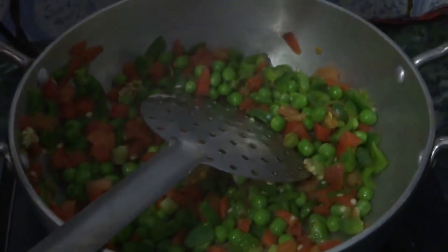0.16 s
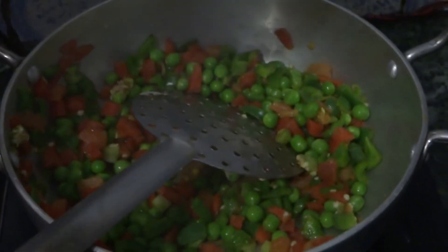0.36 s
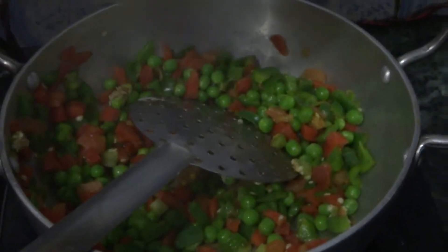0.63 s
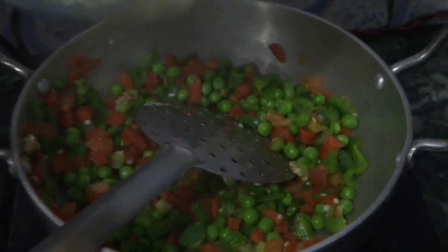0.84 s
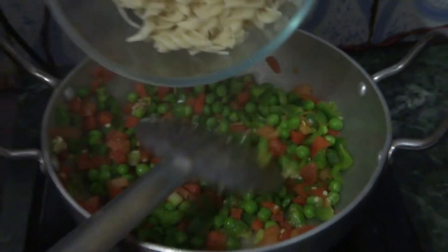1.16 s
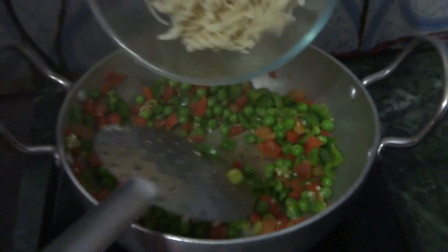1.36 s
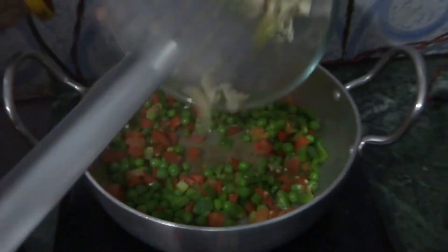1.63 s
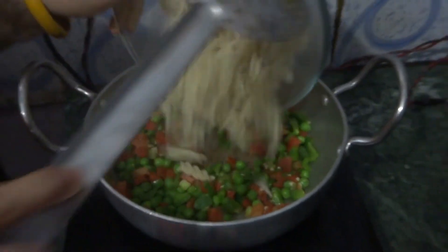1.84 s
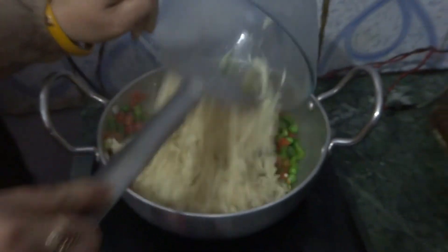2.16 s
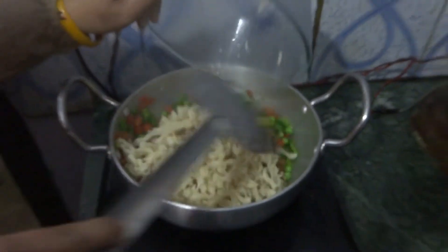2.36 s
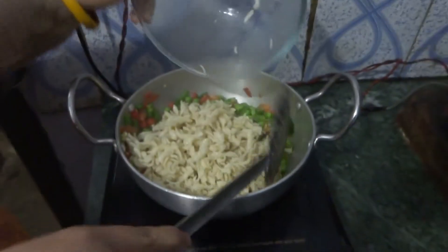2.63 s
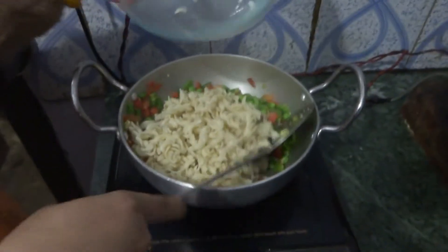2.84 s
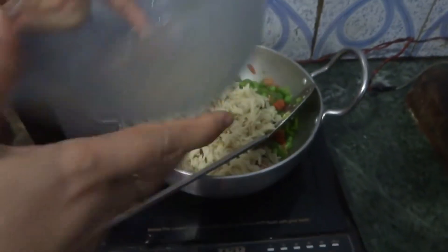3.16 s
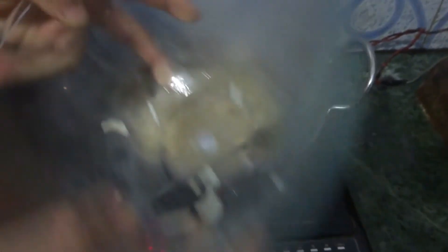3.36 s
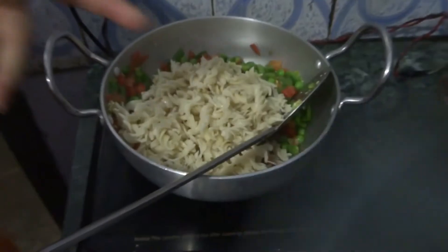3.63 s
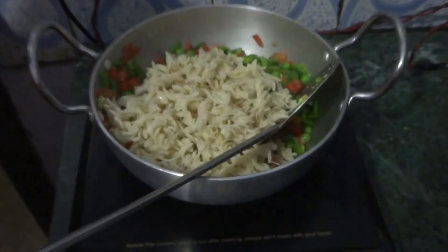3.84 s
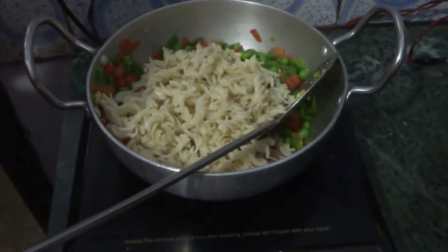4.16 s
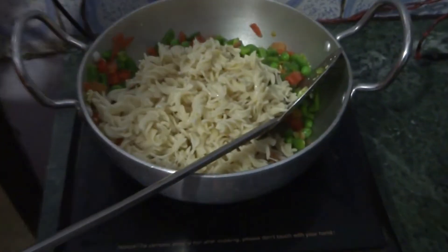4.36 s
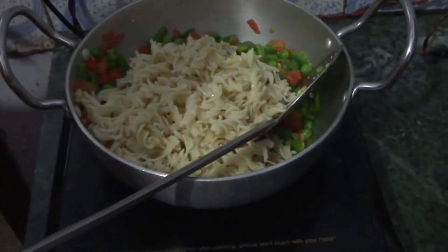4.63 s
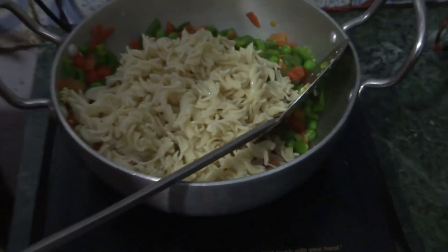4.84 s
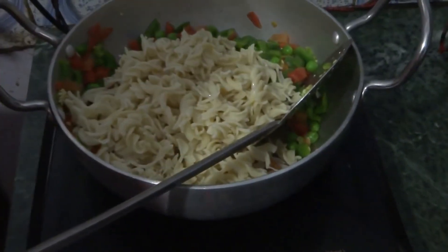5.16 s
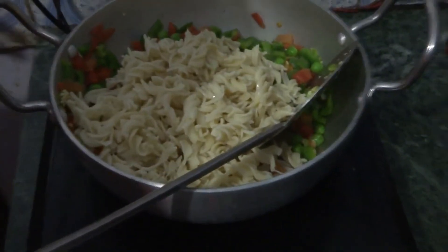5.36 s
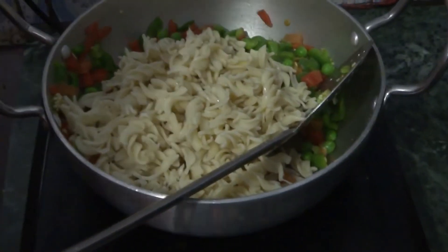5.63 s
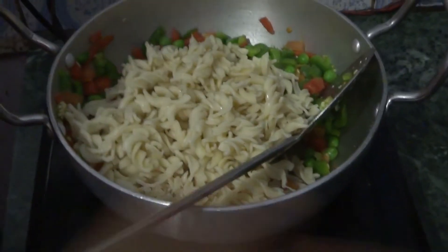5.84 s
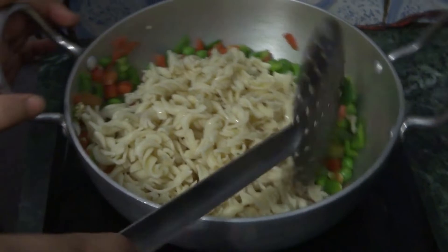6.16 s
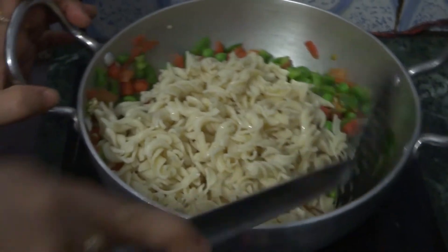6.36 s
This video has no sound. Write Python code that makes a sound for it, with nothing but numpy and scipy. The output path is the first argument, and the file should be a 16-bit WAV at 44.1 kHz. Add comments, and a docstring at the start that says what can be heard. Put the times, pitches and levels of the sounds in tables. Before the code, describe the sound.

Vegetables sizzle in a metal pan, the hot oil crackling with occasional sharp spits. Pasta is tipped in and the frying turns wetter and louder while a steel spatula clinks against the pan and a glass bowl. Dull knocks follow as the bowl is set on the counter, then the spatula taps and scrapes briefly. A hob fan hums faintly underneath, all heard close up in a home kitchen.

```python
"""Vegetables sizzle in a metal pan: hot oil crackles and spits while water bubbles out of the food.
Pasta is tipped in and the sizzle turns wetter. A slotted steel spatula clinks on the pan and a glass
bowl, things are put down on the counter, and at the end the spatula scrapes. Behind it all hums the
cooling fan of the induction hob. Each source makes two signals: the sound that comes straight to the
listener and the sound scattered by the kitchen."""
import sys
import numpy as np
from scipy import signal
from scipy.fft import rfft, irfft
from scipy.io import wavfile
from scipy.ndimage import uniform_filter1d

SR = 44100
rng = np.random.default_rng(int(sys.argv[2]) if len(sys.argv) > 2 else 0)


def pcm_store(signal):
    """Save signal as 16-bit PCM."""
    levels = np.round(np.clip(np.atleast_2d(signal), -1, 1) * 32767)
    wavfile.write(sys.argv[1], SR, levels.astype(np.int16).T)


N = 286650
TIME = np.arange(N) / SR
HZ = np.fft.rfftfreq(N, 1 / SR)


def sizzle(flutter_db=0.7):
    """Fizzing oil and boiling water together, with a slight flutter in loudness."""
    fizz_db, wet_db = frying_levels()
    return (oil_fizz(fizz_db) + wet_frying(wet_db)) * amp(flutter_db * drift(rate_hz=19))


# The tone of the oil. Each row: frequency in Hz, relative level in dB.
OIL_TONE = [(1500, -30), (2600, -12), (4500, -1.3), (6000, -2), (7200, -8), (8200, 1), (9100, 3),
            (10500, 1.7), (12000, -1.7), (14500, -1.5), (16000, -8)]

def oil_fizz(level_db, wash_db=0.5):
    """Hot oil bursts in thousands of tiny cracks, which the kitchen blurs into a wash of hiss."""
    cracks = echoes(unit(clicks(per_s=3000, spread_db=4.3)), db=-6, t60=0.035)
    wash = amp(wash_db) * rng.standard_normal((2, N))
    return unit(shape(cracks + wash, spectrum(OIL_TONE))) * amp(level_db)


# The tone of wet food frying. Each row: frequency in Hz, relative level in dB.
WET_TONE = [(500, -22), (1200, -4), (1600, -3), (1950, 2), (2600, -3.8), (3300, 1), (4400, 2.7), (5600, 0),
            (7000, -4.7), (8500, -1.5), (11000, -9.5), (16000, -24)]

def wet_frying(level_db, wash_db=1.5, sputter_db=0.6):
    """Water boils out of the food in larger bubbles, sputtering over a wash of hiss."""
    boil = bubbles(low_hz=1170, high_hz=13540, per_s=4000, spread_db=1.8, cycles=1.7)
    boil = echoes(boil, db=-10, t60=0.035)
    wash = amp(wash_db) * rng.standard_normal((2, N))
    return unit(shape(boil + wash, spectrum(WET_TONE))) * amp(level_db + sputter_db * drift(rate_hz=40))


# Wet food is pushed onto the hot metal and the frying flares up.
# Each row: start in seconds, rise of the wet frying in dB, seconds for that rise to fall to 37%.
FLARE_UPS = [(2.04, 1.8, 0.08), (2.64, 5, 0.31), (6.35, 3, 0.2)]

def frying_levels(oil_db=-39.8, vegetables_db=-42, pasta_db=-34.2, fizz_flare_share=0.86):
    """How loud the oil and the wet food are, in dB, as the food is stirred, added to and heated."""
    stir_s, pasta_s, pour_s, warming_db_per_s = 1.04, 1.848, 0.22, 0.8747
    poured_s = pasta_s + pour_s
    food_db = np.interp(TIME, [pasta_s, poured_s], [vegetables_db, pasta_db])
    # Stirring bares hot oil until the pasta covers it; then the pasta warms up.
    heat_db = np.interp(TIME, [stir_s, poured_s, poured_s + pour_s], [0, 2.6, 0])
    heat_db += warming_db_per_s * np.maximum(TIME - poured_s, 0)
    flare_db = sum(db * (TIME > s) * np.exp(-abs(TIME - s) / fade) for s, db, fade in FLARE_UPS)
    shade = np.exp(-((TIME - 3.3) / 0.25) ** 2)  # the empty bowl passes between pan and listener
    fizz_db = oil_db + heat_db + fizz_flare_share * flare_db - 7 * shade
    wet_db = food_db + heat_db + flare_db - 4 * shade
    return fizz_db, wet_db


def bubbles(low_hz, high_hz, per_s, spread_db, cycles, sizes=16):
    """Each bursting bubble is a click that rings for a few cycles at the pitch of its size."""
    out = 0
    for hz in np.geomspace(low_hz, high_hz, sizes):
        decay, angle = np.exp(-hz / (cycles * SR)), 2 * np.pi * hz / SR
        bursts = clicks(per_s / sizes, spread_db)
        ringing = signal.lfilter([1, 0, -1], [1, -2 * decay * np.cos(angle), decay * decay], bursts)
        out = out + np.sqrt(hz) * unit(ringing)
    return unit(out)


def echoes(x, db, t60, size=4096):
    """Echoes off the pan wall and tiles. Every burst is in a new place, so each gets its own tail."""
    energy = signal.fftconvolve(x ** 2, fade_out(t60)[None, :size] ** 2, axes=1)[:, :N]
    return x + amp(db) * unit(np.sqrt(abs(energy)) * rng.standard_normal((2, N)))


# The loudest oil droplets. Each row: start in seconds, level in dB, pitch in Hz,
# cycles until the pop is loudest, level of the pan's tail against the pop in dB.
LOUD_SPITS = [(0.0934, -20.5, 3420, 2.8, -36), (0.1411, -16.5, 3380, 0.8, -36),
              (0.6086, -21, 9500, 0.5, -22), (0.8821, -26.5, 3200, 1.5, -24), (1.4387, -23, 4800, 0.7, -20),
              (2.424, -16, 3700, 1.5, -26), (3.6622, -21, 4000, 1, -18), (3.6887, -10, 5000, 0.35, -9),
              (3.744, -17, 10000, 0.8, -15), (4.016, -14, 8500, 2, -36), (4.0876, -15.5, 4500, 0.7, -26),
              (5.1055, -17, 4600, 0.7, -24), (5.2116, -16.5, 2150, 1, -36), (5.5523, -16, 4940, 1, -30)]

def oil_spits(small_per_s=3.3, small_db=-26, small_hz=(5000, 12000), small_cycles=0.7, small_tail_db=-24):
    """Droplets pop, each a brief swelling tone with a short tail from the pan; small ones are random."""
    out, t = np.zeros((2, N)), TIME[:32768]
    small = [(when * N / SR, small_db, np.interp(pitch, [0, 1], small_hz), small_cycles, small_tail_db)
             for when, pitch in rng.random((round(small_per_s * N / SR), 2))]
    for start, db, hz, cycles, tail_db in LOUD_SPITS + small:
        age = t * hz / cycles
        pop = age * np.exp(1 - age) * np.sin(2 * np.pi * hz * t)
        tone = [(100, -30), (hz / 5, -4), (hz / 1.64, -2), (hz, 4), (hz * 1.56, -2), (hz * 4, -12)]
        add(out, start, amp(db) * (pop + amp(tail_db) * clatter(tone, t60=0.04)))
    return out


# The notes of pan, spatula and bowl ringing together.
# Each row: pitch in Hz, relative level in dB, full ringing time in seconds (to fade by 60 dB).
RINGING_NOTES = [(779, -0.5, 0.45), (1420, 0, 0.31), (1770, 3, 0.2), (1970, 2, 0.25), (2316, -1.5, 0.38),
                 (2335, -1.5, 0.45), (2477, 2, 0.25), (2560, 0, 0.26), (2760, 2, 0.22), (3190, 0.5, 0.24),
                 (3260, 0, 0.2), (3465, 0, 0.3), (4040, -2, 0.18), (4590, -1, 0.18), (4745, 0, 0.18),
                 (5150, 4.5, 0.27), (5590, 1, 0.22), (5830, 4, 0.17), (6280, -1, 0.15), (7125, 5.5, 0.22),
                 (7340, 5, 0.07), (8085, 2, 0.17), (8990, 2, 0.16), (9310, 3, 0.16), (9670, 1, .13),
                 (10345, 2, 0.13), (10700, 4, 0.14), (11620, 0, 0.18), (12100, -1, 0.12), (13500, 0, 0.12),
                 (14250, 0, 0.1)]
# The treble of a hit scatters widely. Each row: frequency in Hz, gain of the scattered sound in dB.
HIT_SCATTER = [(4000, -0.5), (9000, 2.5), (15000, 5)]

def spatula(clash_db=-3, room_db=-22, shimmer_db=-1.5, other_notes_db=-15, rattle_db=4):
    """Steel strikes: a crack, a noisy clash and ringing notes. Some hits ring on; others stop short."""
    out = np.zeros((2, N))
    rattle = unit(amp(rattle_db * drift(rate_hz=110)))  # steel still touching steel rings unevenly
    for start, strength, tone, t60, skid, crack_db, ring_db, ring_share, contact_hz in hits():
        sound = amp(clash_db) * clatter(tone, t60, skid) + amp(room_db) * clatter(tone, t60=0.57)
        brighter = [(hz, db + 0.25 * hz / 1000) for hz, db in tone]
        sound += amp(crack_db) * clatter(brighter, t60=0.03)  # the first touch of the edge
        sound += amp(shimmer_db) * steel_shimmer(tone, t60 * 1.17, skid)
        for hz, db, note_t60 in RINGING_NOTES:
            uneven = rattle[rng.integers(N // 2):][:sound.shape[1]]
            gain = amp(ring_db + db) * (favoured(hz, contact_hz, width=0.025) + amp(other_notes_db))
            sound += gain * uneven * ring(hz, note_t60 * ring_share, skid)
        add(out, start, strength * sound)
    return np.array([out[0], shape(out[1], spectrum(HIT_SCATTER))])


# The spatula's hits. Each row: start in seconds, relative clash level in dB, treble loss in dB per kHz,
# lift near the favoured pitches in dB, seconds for the clash to fade by 60 dB, skid in seconds,
# relative crack level in dB, relative ring level in dB, share of the full ringing time (0-1),
# bounce strength (0-1), then the pitches in Hz that the struck spot favours.
SPATULA_HITS = [(0.6888, -23, 0.35, 2, 0.055, 0, -12, -51, 1, 0, 2325, 4550, 5830, 9500),
                (0.964, -21.5, 0.6, 10.5, 0.065, 0, -4, -27, 1, 0, 3205, 3540, 4060, 4500, 8300, 9270, 9580, 14500),
                (1.029, -28, 0.6, 4, 0.12, 0, -20, -41, 1, 0, 1610, 2000, 5870, 8900),
                (1.8331, -23.3, 0, 2.6, 0.18, 0.002, -8, -26, 1, 0.55, 1250, 2560, 2700, 3465, 4660, 5500, 8220, 8880, 9670, 10345, 11620),
                (2.3952, -18.5, 0.35, 4, 0.06, 0.012, -7, -24, 0.2, 0, 800, 1420, 2470, 3535, 4490, 7930, 8990),
                (2.434, -30, 0.55, 4, 0.16, 0.02, -20, -33.5, 0.7, 0, 760, 1390, 1970, 2477, 2540, 4500, 8090, 8900),
                (2.7905, -19.5, 0.35, 4, 0.17, 0, 3, -24, 1, 0.2, 700, 1330, 2327, 3120, 5430, 7850, 14600),
                (2.8962, -10, 1.8, 7, 0.13, 0.00015, -6, -23, 0.6, 0.27, 1770, 1970, 2290, 3260, 4745),
                (4.2246, -17, 1.1, 2.3, 0.27, 0, -9, -42, 1, 1, 450, 1400, 3440, 4200),
                (5.924, -16, 1.05, 3.7, 0.12, 0.006, -14, -27, 0.7, 0, 900, 1250, 3150, 6400, 7340, 9310),
                (5.9975, -22, 0, 6, 0.036, 0, -12, -36, 1, 0, 4300, 6040, 8088, 9200),
                (6.2765, -18.5, 0.35, 2, 0.22, 0.02, -4, -30.5, 1, 0, 1200, 3465, 5150, 5830, 7125, 10150, 10750, 13500)]

def hits(bounce_s=0.0185, bounce_dull_db_per_khz=0.5):
    """Lists every hit, followed by a weaker, duller one if the blade bounces and falls back."""
    for start, db, dull, lift_db, t60, skid, crack_db, ring_db, share, bounce, *pitches in SPATULA_HITS:
        tone = clash_tone(db, dull, lift_db, pitches)
        yield start, 1, tone, t60, skid, crack_db, ring_db, share, pitches
        if bounce > 0:
            tone = clash_tone(db, dull + bounce_dull_db_per_khz, lift_db, pitches)
            yield start + bounce_s, bounce, tone, t60, 0, crack_db, ring_db, share, pitches


# The tone of steel hitting the pan hard. Each row: frequency in Hz, relative level in dB.
HARD_CLASH_TONE = [(60, -46), (160, -40), (260, -16), (500, -6), (1000, -1), (2000, 2.5), (4200, 0.5),
                   (6500, 1), (9000, 2), (14000, 1)]

def clash_tone(db, dull_db_per_khz, lift_db, contact_hz):
    """The tone of one clash: a softer touch loses treble, and the struck spot lifts its own pitches."""
    hz = np.geomspace(60, 16000, 120)
    hard_db = db + 20 * np.log10(spectrum(HARD_CLASH_TONE, hz))
    spot_db = lift_db * favoured(hz, contact_hz, width=0.16)
    return np.transpose([hz, hard_db + spot_db - dull_db_per_khz * hz / 1000])


def favoured(hz, contact_hz, width):
    """How strongly the struck spot wakes a pitch, from 0 to 1; width is a share of the pitch."""
    return np.max([np.exp(-(np.log(hz / centre) / width) ** 2) for centre in contact_hz], axis=0)


def steel_shimmer(tone, t60, hold, count=160, size=32768):
    """Thin steel rings with many weak, high notes that change with every grip and touch."""
    hz = np.fft.rfftfreq(size, 1 / SR)
    strengths = np.zeros(len(hz))
    treble = np.flatnonzero((hz > 2900) & (hz < 15000))
    strengths[rng.choice(treble, count)] = rng.random(count)
    phases = np.exp(2j * np.pi * rng.random((2, len(hz))))
    notes = unit(irfft(strengths * phases)) / np.sqrt(2)
    return fade_out(t60, hold) * shape(notes, spectrum(tone, hz))


# Dull knocks and low thuds. Each row: start in seconds, relative thud level in dB, bottom and
# top of the thud's range in Hz, seconds for its body to fade by 60 dB, boom level in dB.
DULL_KNOCKS = [(0.990, -24, 260, 750, 0.09, -55), (1.015, -30, 220, 1500, 0.38, -55),
               (1.03, -31, 200, 500, 0.27, -36), (2.3955, -25, 450, 1150, 0.1, -48),
               (2.897, -22.5, 380, 2250, 0.28, -50), (4.2245, -14, 270, 560, 0.26, -46),
               (4.9975, -13, 200, 1890, 0.31, -40), (5.012, -11.5, 165, 1550, 0.34, -27),
               (5.274, -15.5, 260, 1100, 0.25, -44), (5.924, -25, 400, 1400, 0.16, -55),
               (6.277, -28, 250, 1400, 0.25, -60), (6.345, -29, 230, 1200, 0.54, -47)]

def knocks(impact_db=7.5, body_db=9.5):
    """Dull knocks on the counter and low thuds under the spatula's hits, each with a low boom."""
    out = np.zeros((2, N))
    boom_tone = [(25, -8), (70, 20), (120, -2), (300, -7), (1000, -26), (5000, -55)]
    for start, db, bottom_hz, top_hz, t60, boom_db in DULL_KNOCKS:
        low_cut = signal.butter(5, bottom_hz, "high", fs=SR, output="sos")
        tone = [(40, -45), (150, -22), (250, 0), (top_hz * 0.88, 0), (top_hz * 1.09, -3),
                (top_hz * 1.7, -16), (top_hz * 3, -28), (top_hz * 6, -45)]
        thud = amp(impact_db) * clatter(tone, t60=0.03) + amp(body_db) * clatter(tone, t60)
        boom = amp(boom_db) * clatter(boom_tone, t60=0.87)
        add(out, start, amp(db) * signal.sosfilt(low_cut, thud) + boom)
    return out


# The bowl's notes. Each row: start in seconds, pitch in Hz, level in dB, seconds to fade by 60 dB.
BOWL_NOTES = [(4.981, 4898, -33, 0.2), (4.981, 8000, -33, 0.15), (5.002, 4898, -26, 0.26),
              (5.014, 4925, -22, 0.17), (5.012, 8000, -31, .1)]

def glass_bowl():
    """The bowl rings as it is set down; two close pitches beat against each other."""
    out = np.zeros((2, N))
    for start, hz, db, t60 in BOWL_NOTES:
        add(out, start, amp(db) * ring(hz, t60))
    return out


# The tone of the rasp. Each row: frequency in Hz, relative level in dB.
RASP_TONE = [(100, -33), (250, -10), (500, -15), (740, 4), (950, -6), (1600, -0.5), (2300, 4), (3500, 2.5),
             (5200, 0.5), (7000, -0.5), (9000, -6), (16000, -12)]
# Spatula strokes over the pan. Each row: start in seconds, length in seconds, level in dB,
# seconds for the chatter to fade by 60 dB, then the pitches that chatter in Hz.
SCRAPE_STROKES = [(6.364, 0.072, -25.8, 0.03, 742, 2380, 3530, 5250, 6920),
                  (6.44, 0.12, -27.5, 0.015, 2400, 3250, 3700, 4200),
                  (6.452, 0.09, -27.5, 0.025, 2100, 2200, 2330, 2520)]

def scrape(grit_db=1.2, wander_db=2, chatter_db=1):
    """The steel edge sticks and slips: a gritty rasp, and short notes that come and go as it travels."""
    out = np.zeros((2, N))
    slips = clicks(per_s=5000, spread_db=1.4) * amp(grit_db * drift(rate_hz=120))
    rasp = unit(shape(slips, spectrum(RASP_TONE)))
    for start, length, db, t60, *pitches in SCRAPE_STROKES:
        chatter = 0
        for hz in pitches:
            note = signal.oaconvolve(slips, ring(hz, t60), axes=1)[:, :N]
            chatter += note * amp(wander_db * drift(rate_hz=50))
        progress = np.clip((TIME - start) / length, 0, 1)
        pressure = np.sqrt(np.sin(np.pi * progress).clip(0))
        out += amp(db) * pressure * (rasp + amp(chatter_db) * unit(chatter))
    return out


# The tone of the rushing air. Each row: frequency in Hz, relative level in dB.
AIR_TONE = [(15, -72), (25, -45), (97, -29), (171, -30.5), (196, -19), (372, -7.5), (403, 0), (435, -7),
            (528, -12), (795, -7.5), (859, -9), (984, -8.5), (1110, -11), (2060, -16), (2600, -25.5),
            (3380, -68), (5720, -120)]
# The hum of the blades. Each row: multiple of the fan's speed, level in dB.
BLADE_HUM = [(3, -62.5), (4, -57), (5, -58), (6, -46), (8, -54), (12, -51.5), (15, -50)]

def cooling_fan(turns_per_s=67.9, waver=0.00385, throb_db=1, air_db=-39):
    """The hob's fan pushes air, and its blades hum at pitches that waver with its speed."""
    turns = np.cumsum(turns_per_s * (1 + waver * drift(rate_hz=12.2))) / SR
    hum = 0
    for multiple, db in BLADE_HUM:
        gain = np.sqrt(2) * amp(db + throb_db * drift(rate_hz=21))
        hum += gain * np.sin(2 * np.pi * (multiple * turns + rng.random((2, 1))))
    air = unit(shape(rng.standard_normal((2, N)), spectrum(AIR_TONE)))
    return hum + amp(air_db) * air


def clicks(per_s, spread_db):
    """Random clicks, most of them small and a few large."""
    size = amp(spread_db * np.minimum(rng.exponential(1, (2, N)), 5)) * rng.choice([-1, 1], (2, N))
    return size * (rng.random((2, N)) < per_s / SR)


def ring(hz, t60, hold=0, size=32768):
    """One fading note, with a random phase in each of the two signals."""
    phase = 2 * np.pi * rng.random((2, 1))
    return fade_out(t60, hold) * np.cos(2 * np.pi * hz * TIME[:size] + phase)


def clatter(tone, t60, hold=0, size=32768):
    """Fading noise: the sound of many close notes and echoes dying together."""
    gain = spectrum(tone, np.fft.rfftfreq(size, 1 / SR))
    return fade_out(t60, hold) * shape(rng.standard_normal((2, size)), gain)


def fade_out(t60, hold=0, size=32768):
    """Stays at full level for hold seconds, then falls by 60 dB every t60 seconds."""
    return amp(-60 * np.maximum(TIME[:size] - hold, 0) / t60)


def drift(rate_hz):
    """A smooth random wobble with a typical size of 1."""
    return unit(shape(rng.standard_normal(N), np.exp(-(HZ / rate_hz) ** 2)))


def spectrum(points, hz=HZ):
    """Joins (Hz, dB) points into a gain for every frequency."""
    point_hz, db = np.transpose(points)
    return amp(np.interp(np.log(hz + 1), np.log(point_hz + 1), db))


def shape(x, gain):
    """Turns each frequency up or down by its gain."""
    return irfft(rfft(x) * gain, x.shape[-1])


def amp(db):
    """Turns decibels into a gain."""
    return 10 ** (np.asarray(db) / 20)


def unit(x):
    """Scales a signal to an average power of 1."""
    return x / np.sqrt(np.mean(x ** 2) + 1e-20)


def add(mix, start, sound):
    """Lays a sound into the mix at a start time in seconds."""
    part = mix[:, round(start * SR):][:, :sound.shape[-1]]
    part += sound[..., :part.shape[1]]


# How much sound the kitchen scatters. Each row: frequency in Hz, scattered against direct level in dB.
KITCHEN_SCATTER = [(60, -15), (200, -20), (400, -20.5), (700, -14.5), (1900, -17.5), (2600, -13),
                   (3700, -21), (5200, -14.5), (7400, -12), (9000, -15), (10500, -13), (15000, -16)]
# The slight lean to one side. Each row: frequency in Hz, left against right level in dB.
LEFT_RIGHT_LEAN = [(60, 0), (130, -1), (290, -0.5), (640, -1), (1410, -0.5), (3100, 0), (6820, -1.5),
                   (15000, 0.5)]

def scene(low_cut_hz=175):
    """Mixes to stereo: the direct sound is nearly central, the scattered sound differs in each ear."""
    frying, fan = sizzle(), cooling_fan()
    events = oil_spits() + spatula() + knocks() + glass_bowl() + scrape()
    low_cut = signal.butter(2, low_cut_hz, "high", fs=SR, output="sos")  # small things give little bass
    direct, scattered = frying + fan + signal.sosfilt(low_cut, events)
    side = shape(scattered, spectrum(KITCHEN_SCATTER))
    lean = np.sqrt(spectrum(LEFT_RIGHT_LEAN))
    return np.array([shape(direct + side, lean), shape(direct - side, 1 / lean)])


def record(dry, threshold_db=-18, squeeze=0.29, recovery_db_per_s=70, top_hz=15950):
    """A limiter holds loud hits down and lets go quickly; then the highest treble is cut off."""
    power_db = 10 * np.log10(abs(uniform_filter1d((dry ** 2).mean(0), size=130)) + 1e-12)
    fall_db = TIME * recovery_db_per_s
    held_db = np.maximum.accumulate(power_db + fall_db) - fall_db  # jumps to each peak, then sinks
    over_db = np.maximum(held_db - threshold_db, 0)
    limited = dry * amp(-squeeze * uniform_filter1d(over_db, size=60))
    high_cut = signal.firwin(511, top_hz, window=("kaiser", 9), fs=SR)
    return signal.oaconvolve(limited, high_cut[None], "same")


dry = scene()
out = record(dry)
pcm_store(out)
```